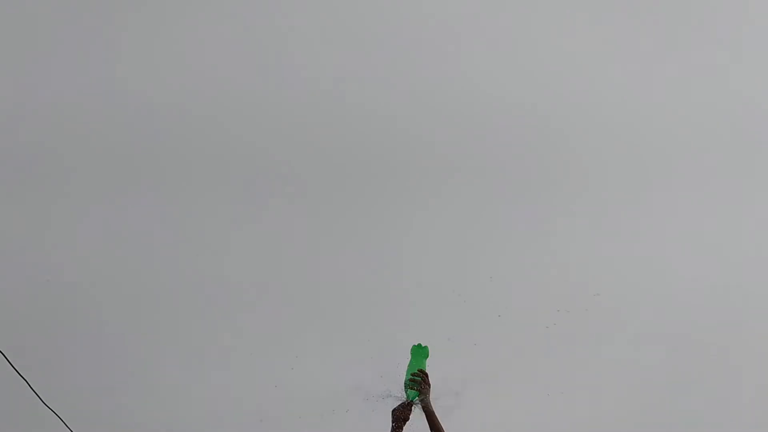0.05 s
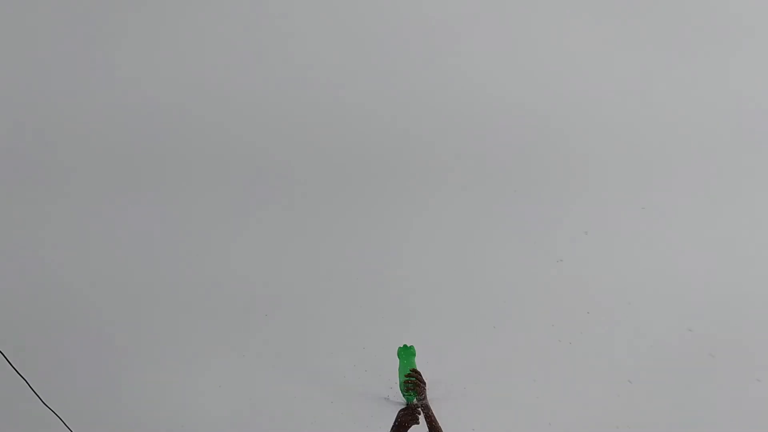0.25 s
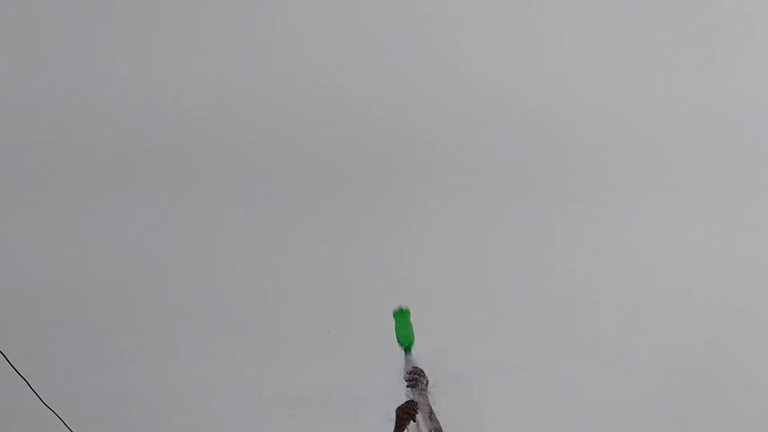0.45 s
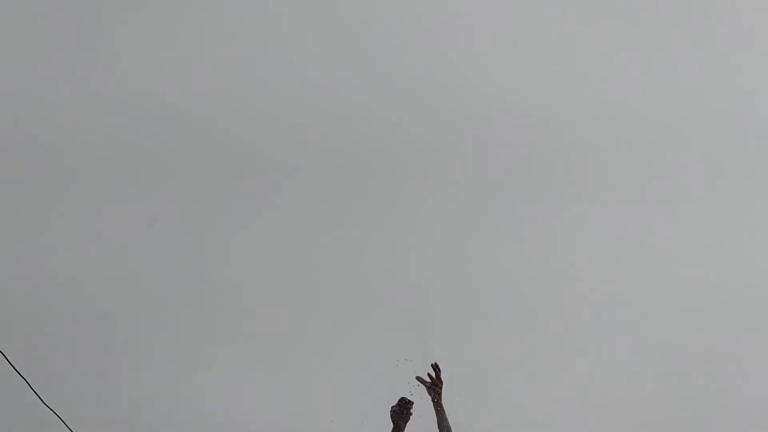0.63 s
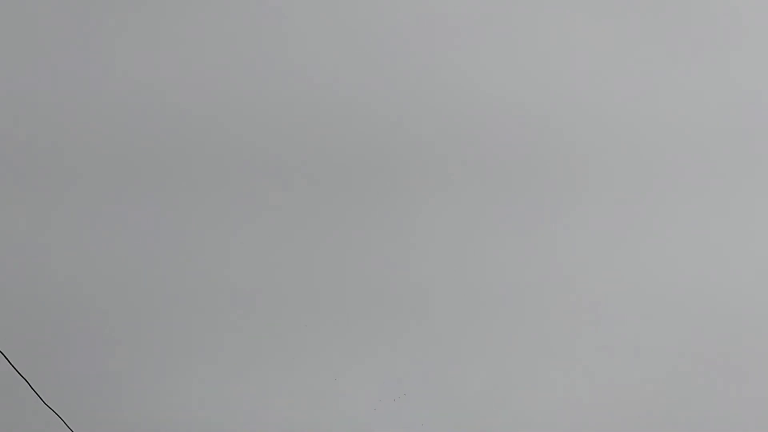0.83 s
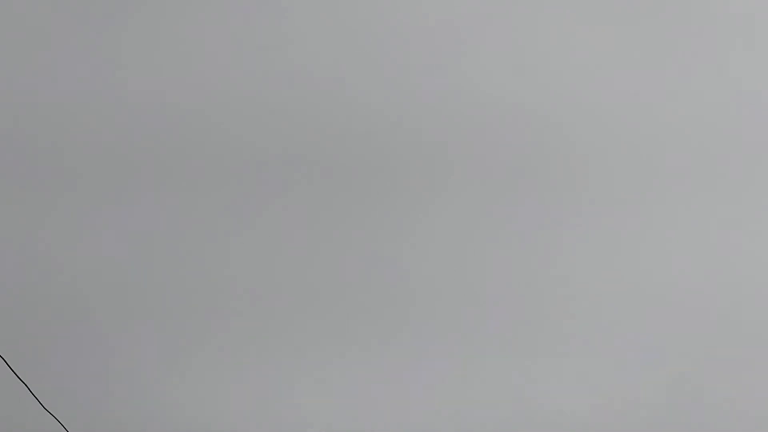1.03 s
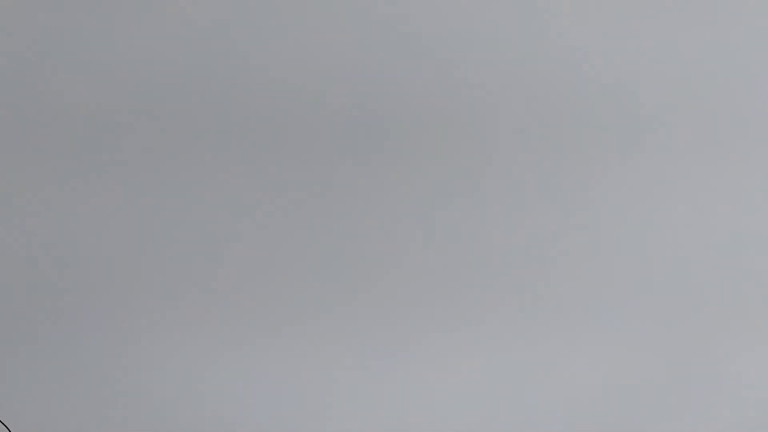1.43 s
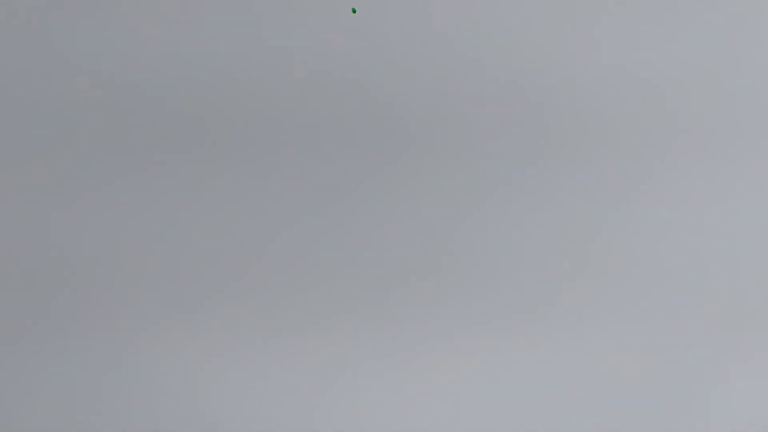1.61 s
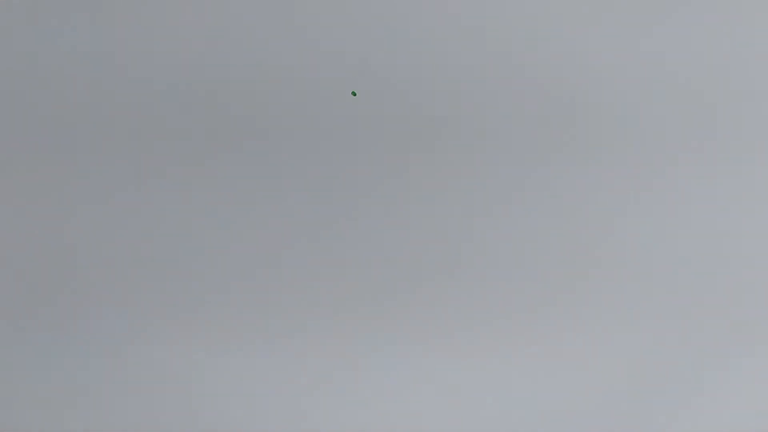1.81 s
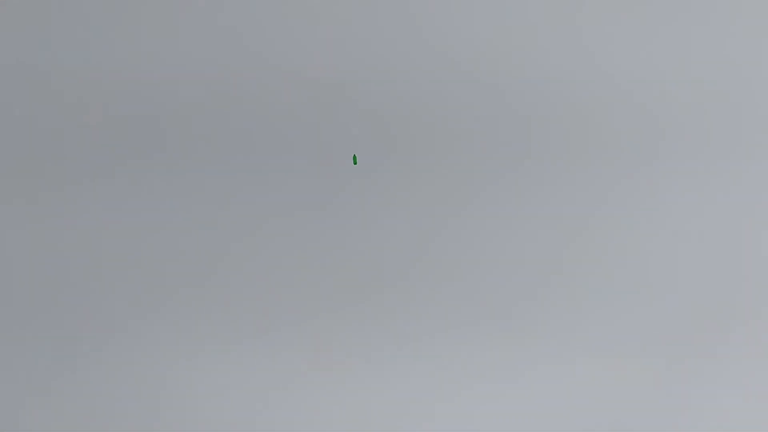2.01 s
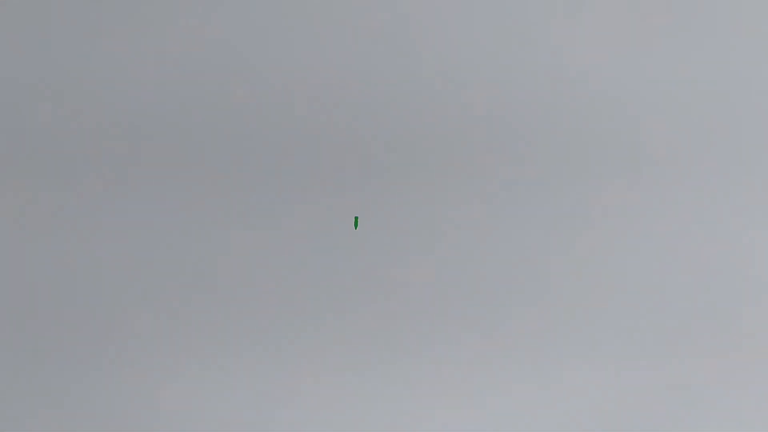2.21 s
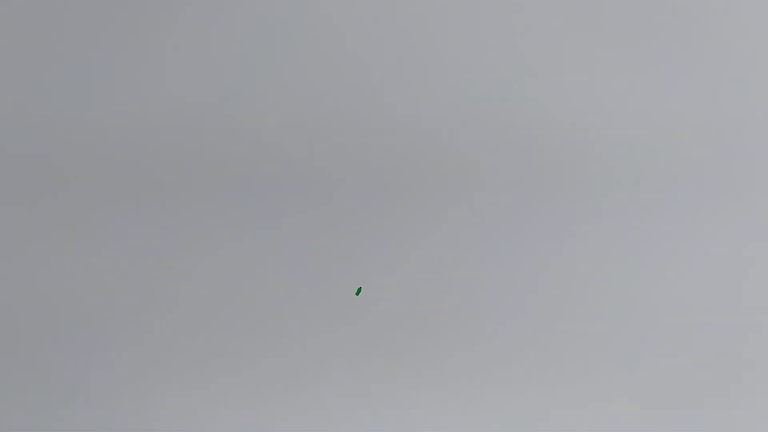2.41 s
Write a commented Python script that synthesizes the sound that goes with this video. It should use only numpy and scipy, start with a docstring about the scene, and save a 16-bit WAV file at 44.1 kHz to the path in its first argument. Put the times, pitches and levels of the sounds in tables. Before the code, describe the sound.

A water bottle rocket launches close by outdoors. For the first half second, fine spray fizzes from its seal. At about 0.5 seconds it lets go with a shrill spurt, a hollow pop and a blast of air, echoing briefly. Water patters down from 0.6 to 2 seconds, with sharp ticks from bigger drops. A very faint, distant hoot comes around 1 second. Insects buzz steadily throughout.

```python
"""Water bottle rocket launch

A hand-held bottle rocket goes off outdoors, over a steady chorus of insects. The seal leaks a
fine spray, then lets go: a sharp jet of water, a hollow pop and a blast of air that echoes
round the yard. The thrown water patters down, and something far off hoots faintly.
Hisses and puffs are shaped noise, sprays are many tiny clicks, and the pop is a few fading tones."""
import sys
import numpy as np
from scipy import signal
from scipy.fft import rfft, irfft
from scipy.io import wavfile

SR = 44100
rng = np.random.default_rng(int(sys.argv[2]) if len(sys.argv) > 2 else 0)


def wrap_up_sound(samples):
    """Save the sound to the file named by the first command line argument, as 16-bit audio."""
    columns = np.atleast_2d(samples).T
    # keep every value between -1 and 1, then stretch to whole-number steps
    tamed = np.clip(columns, -1, 1)
    steps = np.round(tamed * 32767).astype(np.int16)
    wavfile.write(sys.argv[1], SR, steps)


N = 112454

# A colour says how strong each pitch is within one sound: (frequency [Hz], relative level [dB])
LOW_INSECT_COLOUR = [(3600, -31.5), (4100, -17), (4500, -0.5), (4900, 0.5), (5300, -2.5), (5900, -6.5),
                     (6600, -24), (7600, -51.5)]
HIGH_INSECT_COLOUR = [(3500, -35.5), (6000, -6), (7200, -3), (8000, -7), (9100, 5), (10000, -4),
                      (11000, -10.5), (12000, -33), (15500, -27.5)]
AIR_COLOUR = [(20, 1), (35, -7), (60, -8), (150, -11), (400, -15), (800, -20), (1400, -20), (2300, -21),
              (3300, -22), (8000, -49)]
LEAK_COLOUR = [(1000, -25), (2600, -18), (3800, -16), (6300, -9.5), (7500, -6), (8700, -2), (10000, -4),
               (12000, -8), (15500, -21)]
JET_COLOUR = [(120, -55), (200, -27), (500, -18.5), (805, -27), (1040, -14.5), (1340, -30.5), (2460, -18),
              (3300, -20.5), (3750, -22.5), (6380, -14.5), (8400, -3), (10100, -10), (16000, -34.5)]
PATTER_COLOUR = [(1500, -17), (4000, -18), (6300, -12.5), (7600, -8), (8800, 0), (10000, -4.5),
                 (11500, -5.5), (15500, -17)]
PUFF_COLOUR = [(20, -7), (45, -9), (85, 1), (170, 0.5), (260, -9), (370, -4.5), (700, -13.5), (1500, -40.5),
               (4000, -69.5)]
BLAST_COLOUR = [(100, -42.5), (260, -21.5), (365, -6), (600, -11.5), (800, -12.5), (1080, -7), (1400, -9),
                (1650, -11.5), (2350, -10), (2900, -11), (3210, -30), (3550, -21), (6310, -19.5),
                (6810, -22.5), (8110, -13), (13400, -31), (16000, -52.5)]
SPLATTER_COLOUR = [(300, -21.5), (800, -1.5), (1800, -6.5), (3200, -3.5), (4500, -0.5), (7000, -3),
                   (16000, -27.5)]
# spray leaking past the seal: (time [s], level [dB])
LEAK_LEVELS = [(0, -35), (.14, -32), (.3, -30.5), (.4, -33.5), (.47, -35), (.53, -34), (.56, -66.5)]
# the shower of falling water: (time [s], level [dB])
PATTER_LEVELS = [(.6, -36.5), (.73, -44.5), (.775, -33.5), (.82, -39.5), (.865, -34), (.9, -39),
                 (1.02, -43), (1.055, -39), (1.12, -43.5), (1.24, -39.5), (1.275, -40), (1.33, -40),
                 (1.45, -47.5), (1.8, -46), (2, -85.5)]
# big drops landing: (time [s], tick peak [dB], splash level [dB])
BIG_DROPS = [(0.77, -19, -28.5), (0.923, -20, -38), (1.049, -19, -32), (1.188, -21, -37),
             (1.19, -14.5, -36.5), (1.1994, -19, -55), (1.256, -16, -37), (1.2596, -19, -38),
             (1.271, -25, -33.5), (1.2773, -18, -42), (1.2823, -23, -57), (1.308, -26, -43),
             (1.575, -38, -39.5), (1.6562, -35, -41)]
# echoes off walls and ground: (delay [s], level [dB], low edge [Hz], high edge [Hz])
ECHOES = [(.019, -5.5, 850, 2700), (0.0304, -8.5, 200, 1000), (.057, -25, 200, 1500)]
# short tones that colour the launch pop: (frequency [Hz], level before muffling [dB], fade time [s])
POP_TONES = [(164.4, -39.5, 0.45), (361.4, -20.5, 0.17), (440, -19.5, 0.076), (530, -4.5, 0.018),
             (1055, -22, .05), (1372, -19, 0.05), (2323, -26.5, .06), (2800, -28, .06)]
# air following the water out: (time [s], hold [s], level [dB])
AIR_SURGES = [(0.5473, 0.0055, -15), (0.5594, 0.018, -24)]
# gobs of water hitting the ground: (time [s], frequency [Hz], level [dB])
THUDS = [(0.874, 225, -50), (1.029, 318.5, -55.5), (1.061, 215.3, -53.5)]
# the distant hoot: (time [s], pitch [Hz], level [dB])
HOOT_CURVE = [(.9, 715, -90), (.98, 748, -63.5), (1.06, 762, -60), (1.17, 725, -62), (1.28, 690, -60),
              (1.33, 615, -61), (1.41, 580, -73)]
# how alike left and right are: (frequency [Hz], likeness [-1 opposite to 1 the same])
NEAR_LIKENESS = [(100, 1), (600, 0.4), (1400, 0.41), (2600, 1), (5000, 0.5), (8500, 0.14), (13000, 0.061)]
FAR_LIKENESS = [(100, 0.64), (1000, 1), (4800, -0.069), (9000, -0.72)]
# which side is louder: (frequency [Hz], left minus right [dB])
NEAR_BALANCE = [(300, -1), (2500, -0.2), (6000, 0.5), (8500, -10.5), (10500, 7.5), (13000, 6.5)]
FAR_BALANCE = [(100, -0.5), (4800, -0.46), (9000, 1)]

RELEASE_S = .526  # the seal lets go
LEAK_DROPS_PER_S, PATTER_DROPS_PER_S = 9000, 3500


def from_db(db):
    """Turn decibels into a number to multiply a sound by."""
    return 10 ** (np.asarray(db) / 20)


def unit_level(x):
    """Scale a signal so its average strength (rms) is 1."""
    return x / np.sqrt(np.mean(x ** 2) + 1e-20)


def seconds():
    """The time of every sample."""
    return np.arange(N) / SR


def in_time(rows):
    """Join a table's points in time with straight lines."""
    times, *columns = np.transpose(rows)
    return [np.interp(seconds(), times, column) for column in columns]


def per_frequency(points):
    """Read a table at every frequency of the spectrum."""
    hz, value = np.transpose(points)
    return np.interp(np.log(np.arange(N // 2 + 1) * SR / N + 1), np.log(hz), value)


def lowpass(x, hz):
    """Muffle a sound by softening everything above hz."""
    return signal.sosfilt(signal.butter(2, min(hz, SR / 2 - 1), fs=SR, output="sos"), x)


def bandpass(x, low_hz, high_hz):
    """Soften everything outside a band of frequencies."""
    edges = np.sort(np.clip([low_hz, high_hz], 10, SR / 2 - 1))
    return signal.sosfilt(signal.butter(2, edges, "band", fs=SR, output="sos"), x + 1e-18)


def wobble(hz):
    """A random wobble of typical size 1, mostly slower than hz."""
    return unit_level(lowpass(rng.standard_normal(N + SR), hz)[SR:])


def coloured(colour, near=True, source=None):
    """Give noise (or a source) a colour and a near or far stereo spread, at strength 1."""
    shared, difference = rfft(rng.standard_normal((2, N)) if source is None else source)
    alike = np.clip(per_frequency(NEAR_LIKENESS if near else FAR_LIKENESS), -1, 1)
    sides = np.array([[1], [-1]])
    pan = from_db(sides * per_frequency(NEAR_BALANCE if near else FAR_BALANCE) / 2)
    stereo = np.sqrt(1 + alike) * shared + sides * np.sqrt(1 - alike) * difference
    return unit_level(irfft(from_db(per_frequency(colour)) * pan * stereo, N))


def envelope(start_s, rise_s, hold_s, fade_s):
    """Rise, hold, then die away; the fade time is how long a drop of 60 dB takes."""
    t = seconds() - start_s
    return np.clip(t / rise_s, 0, 1) ** 2 * from_db(-60 * np.maximum(t - rise_s - hold_s, 0) / fade_s)


def droplets(per_s, spread_db=1.5):
    """Two random streams of tiny clicks, mostly small, a few larger."""
    sizes = from_db(spread_db * np.minimum(rng.exponential(1, (2, N)), 5))
    signs = rng.choice([-1, 1], (2, N))
    return sizes * signs * (rng.random((2, N)) < per_s / SR)


def insects():
    """Many insects rasp at once and blend into two fluttering bands of noise."""
    return sum(from_db(db + 0.5 * wobble(hz=210)) * coloured(colour, near=False)
               for colour, db in ((LOW_INSECT_COLOUR, -40), (HIGH_INSECT_COLOUR, -44.5)))


def outdoor_air():
    """The open air makes a faint, low hush."""
    return from_db(-60.5) * coloured(AIR_COLOUR, near=False)


def leak():
    """Fine spray fizzes past the seal."""
    db, = in_time(LEAK_LEVELS)
    loudness = from_db(db + 1.17 * wobble(hz=43))
    return loudness * coloured(LEAK_COLOUR, source=droplets(LEAK_DROPS_PER_S))


def water_jet():
    """The water shoots out with a short, shrill hiss."""
    burst = envelope(RELEASE_S, rise_s=.0051, hold_s=.017, fade_s=.028)
    return from_db(-14 + 2 * wobble(hz=330)) * burst * coloured(JET_COLOUR)


def falling_water():
    """Droplets shower down, and big drops land with a sharp tick and a splash."""
    db, = in_time(PATTER_LEVELS)
    loudness = from_db(db + 1.3 * wobble(hz=54)) * (seconds() > RELEASE_S)
    shower = loudness * coloured(PATTER_COLOUR, source=droplets(PATTER_DROPS_PER_S))
    tick = bandpass(signal.unit_impulse(N), low_hz=7000, high_hz=11300)
    tick /= np.abs(tick).max()
    ticks = sum(from_db(tick_db) * np.roll(tick, int(s * SR)) for s, tick_db, _ in BIG_DROPS)
    splashes = sum(from_db(splash_db) * envelope(s, rise_s=.0013, hold_s=0, fade_s=.051)
                   for s, _, splash_db in BIG_DROPS)
    hiss = unit_level(bandpass(coloured(PATTER_COLOUR), low_hz=3700, high_hz=16400))
    return shower + ticks + splashes * hiss


def low_puff():
    """A soft, low puff swells and dies away."""
    swell = envelope(start_s=.538, rise_s=.016, hold_s=.051, fade_s=.22)
    return from_db(-31.5) * swell * coloured(PUFF_COLOUR)


def yard_echoes(sound):
    """Walls and ground send back a hard slap and duller echoes, then a thin, dark tail."""
    t = seconds()
    echoes = np.zeros((2, N))
    for delay_s, db, low_hz, high_hz in ECHOES:
        bounced = bandpass(sound, low_hz, high_hz)
        echoes += from_db(db) * np.array([np.interp(t - delay_s, t, side, left=0) for side in bounced])
    even_noise = coloured([(20, 0), (20000, 0)])
    tail = even_noise * envelope(start_s=0, rise_s=.027, hold_s=0, fade_s=.53)
    tail = lowpass(unit_level(tail) / np.sqrt(N), hz=1900)
    return echoes + from_db(-12) * signal.fftconvolve(sound, tail, axes=1)[:, :N]


def launch_pop(start_s=.5464):
    """Short, fading tones colour the hollow pop of the launch."""
    t = seconds() - start_s
    tones = np.zeros(N)
    for hz, db, fade_s in POP_TONES:
        loudness = from_db(db) * envelope(start_s, rise_s=.0022, hold_s=0, fade_s=fade_s)
        tones += loudness * np.sin(2 * np.pi * hz * t)
    return lowpass(tones, hz=2500) * from_db([[-1], [1]])  # a little louder on the right


def air_blast():
    """The squeezed air rushes out in two rough surges."""
    flow = sum(from_db(db) * envelope(s, rise_s=.0015, hold_s=hold_s, fade_s=.059)
               for s, hold_s, db in AIR_SURGES)
    return flow * from_db(0.5 * wobble(hz=200)) * coloured(BLAST_COLOUR)


def splatter():
    """The jet breaks up into a brief, coarse splatter."""
    burst = envelope(start_s=.5577, rise_s=.013, hold_s=.015, fade_s=.13)
    return from_db(-29.5) * burst * coloured(SPLATTER_COLOUR, source=droplets(PATTER_DROPS_PER_S))


def water_thuds():
    """Heavy gobs of water land with soft, low thuds."""
    thuds = np.zeros(N)
    for s, hz, db in THUDS:
        rumble = wobble(hz=86) * np.sin(2 * np.pi * hz * seconds())  # the wobble blurs the pitch
        thuds += from_db(db) * envelope(s, rise_s=.0085, hold_s=.012, fade_s=.22) * rumble
    return thuds


def hoot():
    """A faint, wavering tone, perhaps a far bird, rises, falls and stops."""
    hz, db = in_time(HOOT_CURVE)
    sounding = (seconds() > HOOT_CURVE[0][0]) & (seconds() < HOOT_CURVE[-1][0])
    loudness = sounding * from_db(db + 3 * wobble(hz=31))
    pitch = hz * (1 + .015 * wobble(hz=60))
    return loudness * unit_level(np.sin(2 * np.pi * np.cumsum(pitch) / SR))


def scene():
    """Add the leak, the launch, its echoes and the falling water to the outdoor background."""
    launch = water_jet() + air_blast() + launch_pop() + low_puff() + splatter()
    background = insects() + hoot() + outdoor_air()
    return leak() + launch + yard_echoes(launch) + falling_water() + water_thuds() + background


def record(dry, cutoff_hz=15900):
    """Round off the loudest peaks and cut the very highest treble."""
    treble_cut = signal.ellip(10, .05, 60, cutoff_hz, fs=SR, output="sos")
    return signal.sosfiltfilt(treble_cut, np.tanh(dry))


dry = scene()
out = record(dry)
wrap_up_sound(out)
```